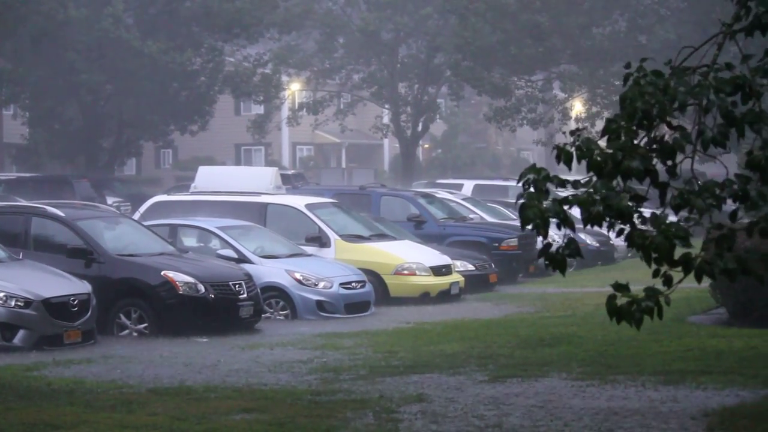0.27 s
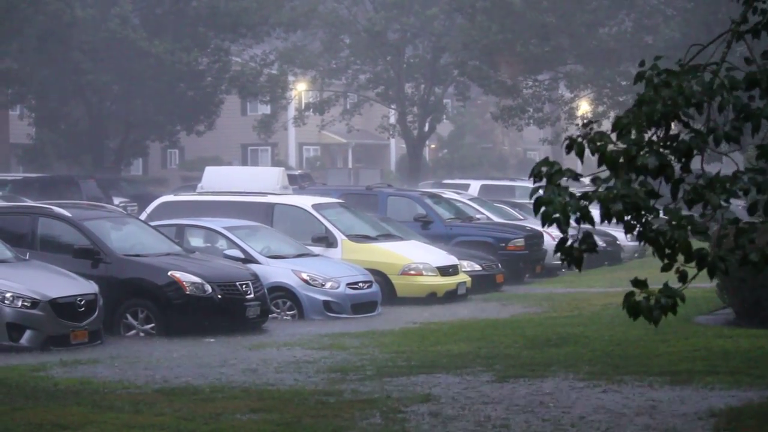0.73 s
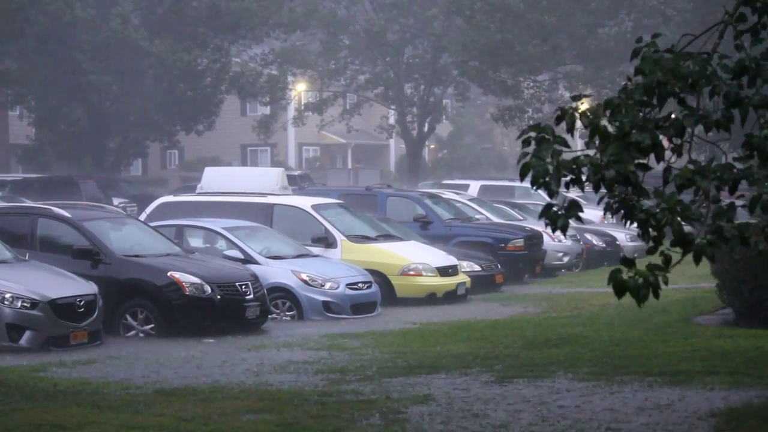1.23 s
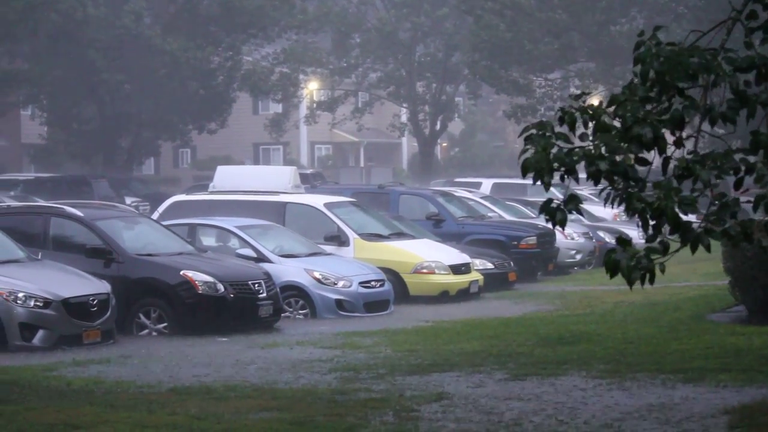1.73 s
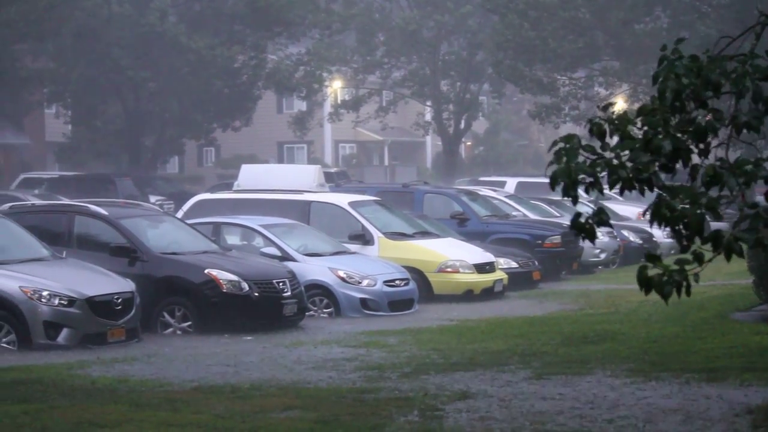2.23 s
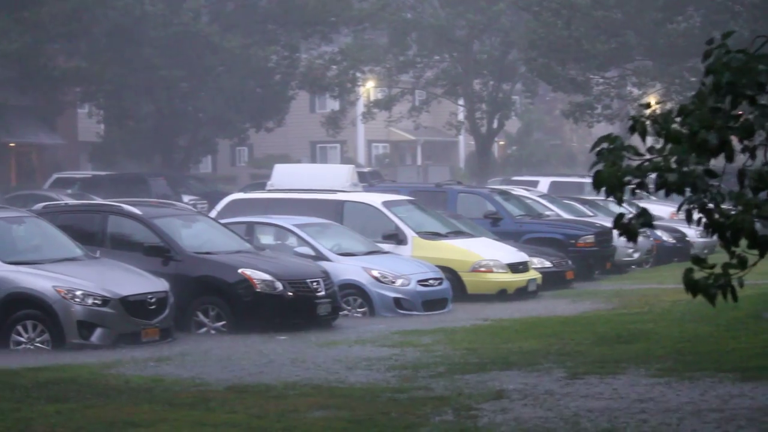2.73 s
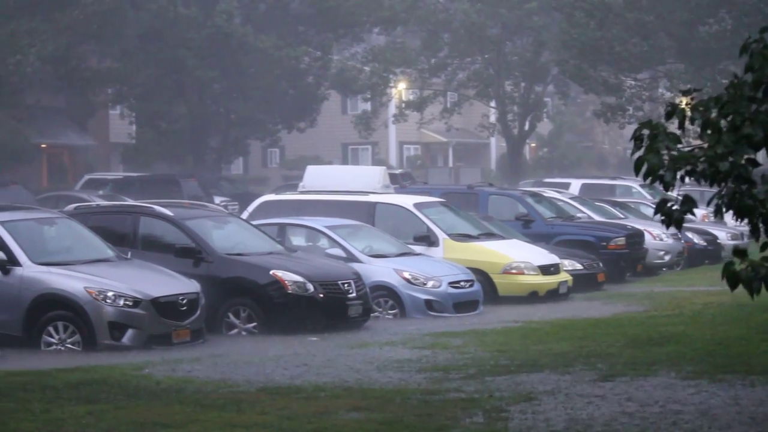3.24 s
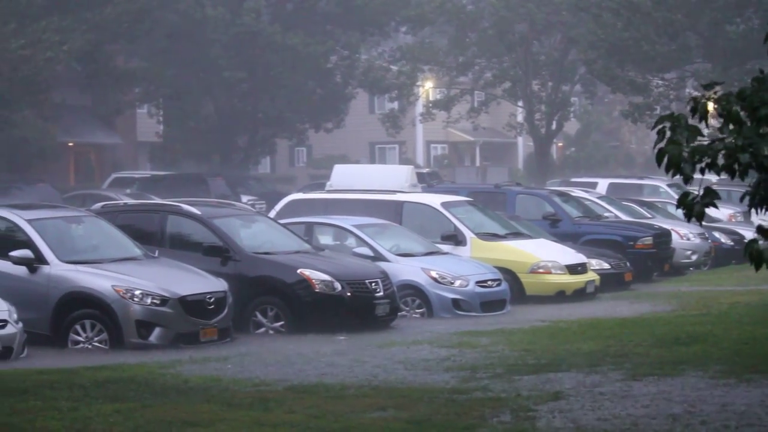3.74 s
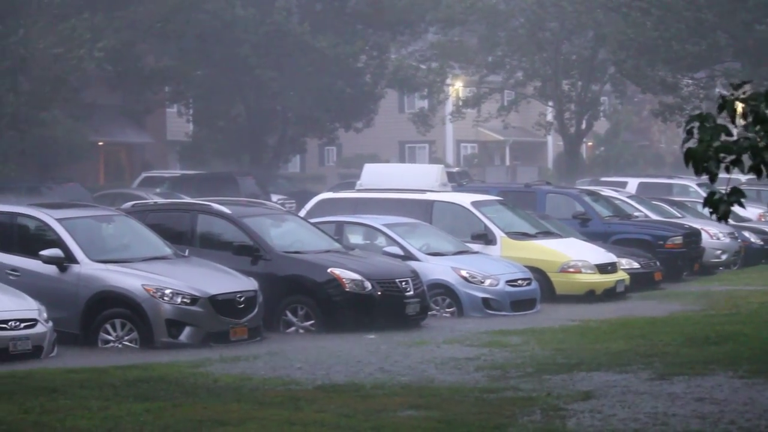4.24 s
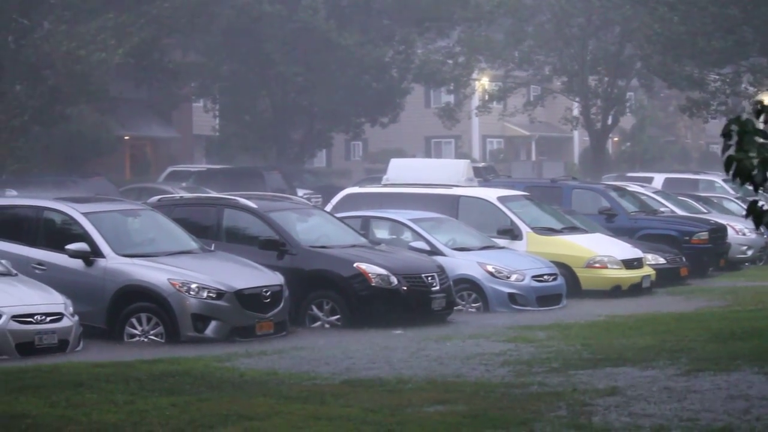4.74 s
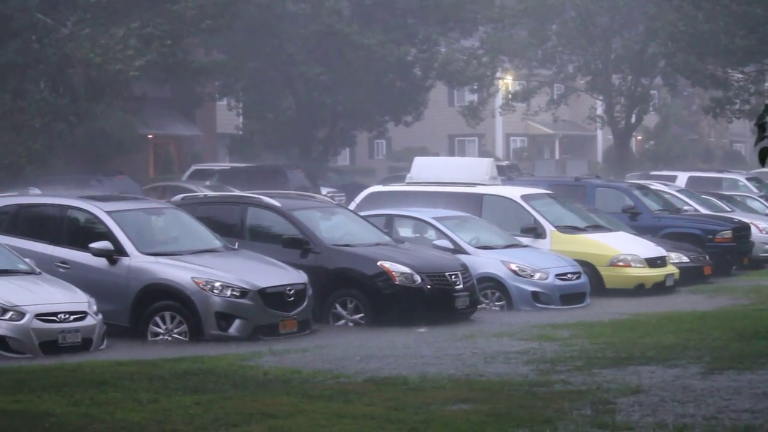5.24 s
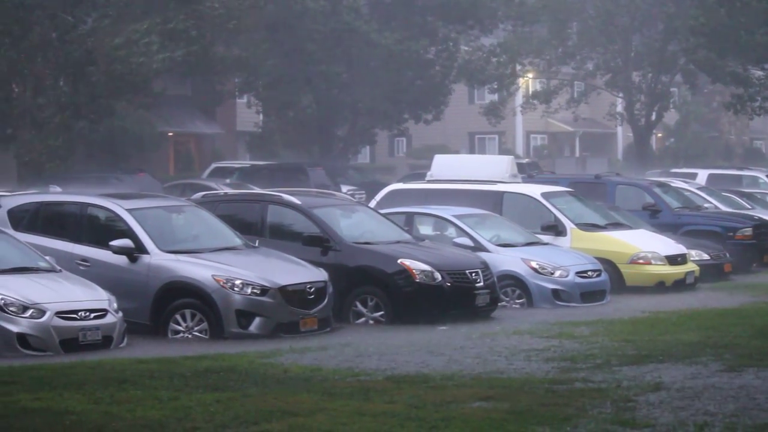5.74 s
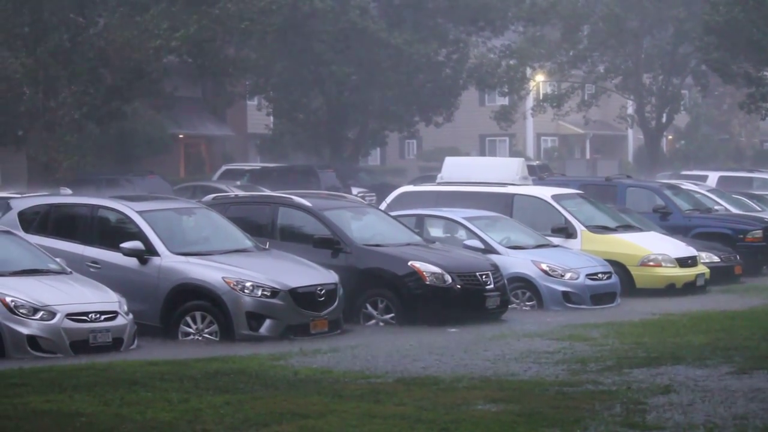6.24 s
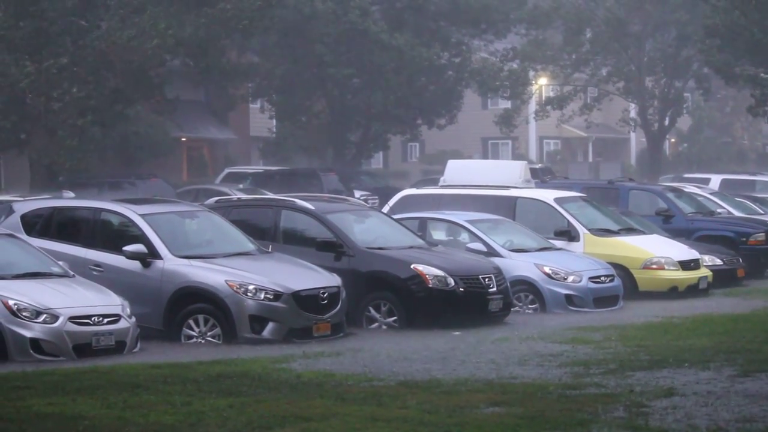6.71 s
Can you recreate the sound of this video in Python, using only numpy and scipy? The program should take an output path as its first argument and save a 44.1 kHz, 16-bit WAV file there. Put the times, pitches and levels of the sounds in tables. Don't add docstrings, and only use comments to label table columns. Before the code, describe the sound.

Steady bright downpour on parked cars and standing water, with sharp irregular drips smacking wet stone near the microphone and occasional puddle plops.

```python
import sys
import numpy as np
from scipy import signal
from scipy.fft import rfft, irfft, next_fast_len
from scipy.io import wavfile
from scipy.ndimage import uniform_filter1d, map_coordinates

SR = 44100
rng = np.random.default_rng(int(sys.argv[2]) if len(sys.argv) > 2 else 0)


def makeup_ratio(level_db):
    decades = np.asarray(level_db, float) / 20
    return 10 ** decades


def file_out(sig):
    cols = np.atleast_2d(sig).T
    lim = np.clip(cols, -1, 1)
    pcm = np.round(lim * 32767).astype(np.int16)
    wavfile.write(sys.argv[1], SR, pcm)


N = 307377

# f/Hz, level/dB
RAIN_COLOUR = [(35, -51), (60, -17.5), (120, -12.5), (165, -3.5), (266, -7.5), (344, -3.5), (425, -4.5),
               (1490, 2), (5770, 4), (8570, 1), (11900, 6), (13300, 3), (15700, -7)]
# t/s, pull/dB
GAIN_PULLS = [(-0.04, 5.8), (0.19, 6.5), (0.46, 6), (0.77, 1.5), (1.0, 3), (1.16, 7), (1.37, 4.0),
              (1.69, 4.8), (1.92, 4), (2.12, 9), (2.28, 1.3), (2.5, 0.5), (2.69, 3), (2.87, 6), (3.3, 4),
              (3.5, 5.4), (3.79, 5.5), (4.06, 8), (4.33, 2.5), (4.47, 2.5), (4.73, 6), (4.96, 6),
              (5.36, 4.5), (5.68, 4.5), (6.01, 6.5), (6.32, 3.5), (6.72, 6)]
# delay/s, level/dB
WALL_ECHOES = [
    (.0012, -13),
    (.0039, -9),
    (.0066, -16),
]
# t/s, peak level/dB, f/Hz
WET_SPLATS = [(0.085, -5, 4200), (0.183, -4, 10000), (0.4588, -1, 13200), (0.5082, -6, 13400),
              (0.6309, -6, 4800), (0.8143, -4, 6200), (1.0969, -4, 11400), (1.3414, -6, 5900),
              (1.6954, -5, 10800), (1.7314, -6, 10800), (2.1781, -6, 9300), (2.6327, -6, 12400),
              (2.8407, -5, 3800), (3.2562, -7, 8000), (3.3437, -5, 10800), (3.5168, -3, 5200),
              (3.8159, -4, 5900), (3.9193, -6, 11100), (4.0035, -4, 6000), (4.0625, 0, 11500),
              (4.131, -3, 5100), (4.4725, -1, 7200), (1.6709, -3, 6000), (5.293, -3, 6300),
              (5.34, -6, 11800), (5.5366, -6, 6400), (5.8451, -8, 5400), (6.0078, -5, 11500),
              (6.0172, -4, 11000), (6.6319, -4, 9700)]
# t/s, peak level/dB, f/Hz
DRY_SPLATS = [(0.2399, -5, 4600), (0.7616, -6, 12200), (0.9274, -6, 11100), (1.1374, -3, 7000),
              (1.2644, -5, 5100), (1.3693, -7, 4800), (1.3969, -6, 12400), (4.7818, -3, 5200),
              (1.9015, -5, 10200), (2.1123, -6, 5000), (2.1202, -2, 12300), (2.7475, -6, 11400),
              (2.8821, -4, 11000), (3.2769, -5, 5600), (3.3512, -4, 12300), (3.4105, -3, 5300),
              (3.6409, -5, 3300), (3.7952, -4, 10800), (3.9317, -5, 5000), (4.3373, -5, 5100),
              (4.7258, -1, 11100), (4.7441, -5, 12100), (4.9377, -6, 12900), (4.9883, -3, 6200),
              (5.3836, -4, 7600), (6.0445, -5, 4300), (6.2526, -6, 12000), (6.4136, -6, 7400),
              (6.6839, -4, 13000), (6.7306, -4, 6700)]
# t/s, peak level/dB, f/Hz
PUDDLE_PLOPS = [(0.138, -26, 1490), (1.095, -11.5, 1700), (1.668, -9.5, 2560), (1.777, -10.5, 2720),
                (2.463, -26, 1590), (3.249, -23, 2000), (4.307, -19, 1590), (4.624, -18, 805),
                (4.664, -26, 760), (5.217, -17, 1890), (5.338, -9.5, 1750), (5.595, -19, 1590),
                (6.265, -16, 1590), (6.675, -23, 1510), (6.721, -17.5, 784), (6.8, -21, 1010),
                (6.856, -32, 1440), (6.918, -8, 2270)]
# t/s, peak level/dB, f/Hz
WATER_SLAPS = [(0.2665, -4.5, 3880), (1.0884, -7, 2870), (1.776, -9, 2950), (2.8327, -8, 3800),
               (3.168, -6, 3760), (3.3046, -4, 3200), (3.3994, -11, 4140), (3.6197, -8, 4300),
               (5.434, -5.5, 3820), (5.6156, -11, 4440), (5.6394, -14, 4310), (5.669, -7, 3570),
               (5.7344, -5, 3800), (6.2992, -4, 3350), (6.41, -6, 4040), (6.7, -6, 4580), (0.168, -6, 5000),
               (1.95, -12, 3100), (3.225, 0, 5500), (3.375, -1, 6000), (6.15, -11, 5500),
               (6.192, -20, 5900), (6.57, -11, 3100)]
# f/Hz, level/dB
MACHINE_HUM = (54, -63.5)

OPEN_DB, USUAL_DB = -13.5, -20
CLAMP_S, RECOVER_S = 0.046, 0.32
SMALL_A_SECOND, BRIGHT_SHARE = 18, 0.75
SMALL_DB, SMALL_SPREAD_DB = -9, 2
BRIGHT_HZ, DULL_HZ = (10000, 13000), (3400, 7500)
WET_SPRAY_DB, DRY_SPRAY_DB = -6.5, -13
SPRAY_GROWS = 0.21


def unit(x):
    return x / np.sqrt(np.mean(x ** 2) + 1e-20)


def wobble(rate):
    return map_coordinates(rng.standard_normal(2000), [np.arange(N) * rate / SR])


def filtered(x, response):
    size = next_fast_len(N + 8192)
    hz = np.fft.rfftfreq(size, 1 / SR) + 1e-3
    return irfft(rfft(x, size) * response(hz), size)[:N]


def colour(hz):
    f, db = np.transpose(RAIN_COLOUR)
    return makeup_ratio(np.interp(np.log(hz), np.log(f), db))


def below(hz, edge_hz):
    return 1 / (1 + (hz / edge_hz) ** 4)


def patchy(depth_db):
    z = signal.stft(rng.standard_normal(N), nperseg=512)[2]
    field = uniform_filter1d(rng.standard_normal(z.shape), size=9, axis=0)
    field = uniform_filter1d(field, size=9, axis=1)
    return signal.istft(z * makeup_ratio(depth_db * unit(field)), nperseg=512)[1][:N]


def grains(s, db, hz, cycles, size, glide=0.0):
    u = np.arange(size) / SR * hz[:, None]
    fade = np.hanning(2 * size)[size:]
    life = (1 - np.exp(-2.5 * u)) * np.exp(-u / cycles) * fade
    shape = np.sin(2 * np.pi * u * (1 + glide * u / cycles)) * life
    at = np.round(s * SR).astype(int)[:, None] + np.arange(size)
    weights = makeup_ratio(db)[:, None] * shape
    return np.bincount(at.clip(0, N).ravel(), weights.ravel(), N + 1)[:N]


def scattered(hz, octaves, tone):
    return np.clip(hz * 2 ** (octaves * (2 * tone - 1)), 100, 14500)


def shower(count, hz, octaves, spread_db, cycles, size, glide=0.0):
    when, big, tone = rng.random((count, 3)).T
    db = -spread_db * np.log(1 - 0.97 * big)
    return unit(grains(when * N / SR, db, scattered(hz, octaves, tone), cycles, size, glide))


def walls(x):
    return x + sum(makeup_ratio(db) * np.roll(x, round(delay * SR)) for delay, db in WALL_ECHOES)


def gain_control():
    s, pull_db = np.transpose(GAIN_PULLS)
    knots = np.arange(0, N, 64)
    since = np.maximum(knots[:, None] / SR - s, 0)
    pulls = pull_db * (1 - np.exp(-since / CLAMP_S)) * np.exp(-since / RECOVER_S)
    pulled = uniform_filter1d(pulls.sum(axis=1), size=30)
    return OPEN_DB - np.interp(np.arange(N), knots, pulled)


def far_roar():
    flicker_db = 0.7 * wobble(90) + 1.4 * wobble(200)
    far = unit(filtered(patchy(depth_db=0.75), colour))
    body = filtered(far, lambda hz: below(hz, 7500))
    return makeup_ratio(0.29 * wobble(16)) * body + makeup_ratio(flicker_db) * (far - body)


def near_patter():
    clumps_db = 2.5 * np.tanh(wobble(60)) + 4 * np.tanh(wobble(130))
    drops = shower(count=9000, hz=10500, octaves=1, spread_db=3, cycles=1.3, size=48)
    return makeup_ratio(-10.5 + clumps_db) * unit(filtered(walls(drops), colour))


def flood_bubbles():
    return makeup_ratio(-24) * shower(count=900, hz=1860, octaves=1.07, spread_db=4, cycles=7.7, size=400, glide=0.06)


def car_roofs():
    drops = shower(count=2500, hz=3000, octaves=1.1, spread_db=3, cycles=1.8, size=128)
    gusts_db = 3.4 * np.tanh(wobble(12)) + 2.6 * np.tanh(wobble(40))
    return makeup_ratio(-15.5) * unit(makeup_ratio(gusts_db) * drops)


def downpour():
    rain = far_roar() + near_patter() + flood_bubbles() + car_roofs()
    return makeup_ratio(gain_control()) * unit(rain)


def hum():
    hz, db = MACHINE_HUM
    level = makeup_ratio(db + 2 + 1.5 * wobble(2.8))
    return level * np.sin(2 * np.pi * np.cumsum(hz + 2.37 * wobble(6.6)) / SR)


def droplets(s, db, hz, count, lasts, octaves, cycles, size):
    late, tone = np.moveaxis(rng.random((len(s), count, 2)), -1, 0)
    pitch = scattered(hz[:, None], octaves, tone)
    when = s[:, None] + lasts * late
    level_db = db[:, None] - 7 * late
    return grains(when.ravel(), level_db.ravel(), pitch.ravel(), cycles, size, glide=0.0069)


def ticks(s, db):
    spikes = filtered(np.bincount(np.round(s * SR).astype(int), makeup_ratio(db), N), colour)
    return spikes / np.mean(colour(np.linspace(1, SR / 2, 999)))


def small_drips():
    when, big, kind, tone = rng.random((SMALL_A_SECOND * N // SR, 4)).T
    low, high = np.where(kind < BRIGHT_SHARE, np.c_[BRIGHT_HZ].T, np.c_[DULL_HZ].T)
    gain_db = gain_control()[(when * N).astype(int)] - USUAL_DB
    db = SMALL_DB + SMALL_SPREAD_DB * (2 * big - 1) + gain_db
    return np.c_[0.001 + when * (N / SR - 0.002), db, low + tone * (high - low)]


def stone_splats():
    small = small_drips()
    rows = np.vstack([WET_SPLATS, DRY_SPLATS, small])
    s, db, hz = rows.T
    spray_db = np.where(np.arange(len(rows)) < len(WET_SPLATS), WET_SPRAY_DB, 1.0 * DRY_SPRAY_DB)
    spray_db[-len(small):] += 4 * rng.random(len(small)) - 3
    spray_db = spray_db + SPRAY_GROWS * (db + 5)
    cycles = (0.8 + hz / 11000)[:, None]
    clicks = None
    impacts = grains(s - 0.75 / hz, db + 4.5, hz, cycles, size=64)
    clicks = walls(impacts - ticks(s, db - 6))
    return clicks + droplets(s, spray_db, hz, count=16, lasts=0.014, octaves=0.46, cycles=2, size=64)


def puddle_plops():
    s, db, hz = np.transpose(PUDDLE_PLOPS)
    plops = grains(s, db, hz, cycles=(3 + 1200 / hz)[:, None], size=1200, glide=0.02)
    return plops + droplets(s, db - 5.5, hz, count=10, lasts=0.022, octaves=0.55, cycles=2.5, size=500)


def water_slaps():
    s, db, hz = np.transpose(WATER_SLAPS)
    return droplets(s - 0.005, db - 6, hz, count=20, lasts=0.03, octaves=0.28, cycles=3, size=160)


def scene():
    rain = downpour()
    drips = stone_splats() + puddle_plops() + water_slaps()
    near = filtered(drips, lambda hz: np.sqrt(below(hz, 16500)))
    return (rain + near + hum())[None]


def roll_off(x):
    return signal.sosfilt(signal.butter(12, 15930, fs=SR, output="sos"), x)


def record(dry):
    thin = filtered(dry[0], lambda hz: 1 - below(hz, 36))
    soft = thin / (1 + np.abs(thin / 1.05) ** 6) ** (1 / 6)
    limited = filtered(soft, lambda hz: hz < 15740)
    return roll_off(limited[None])


dry = scene()
out = record(dry)
file_out(out)
```